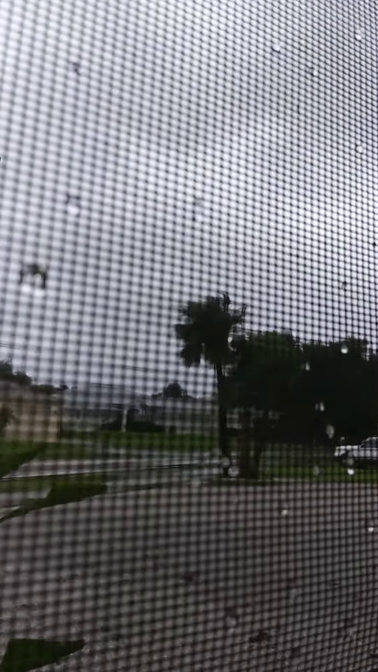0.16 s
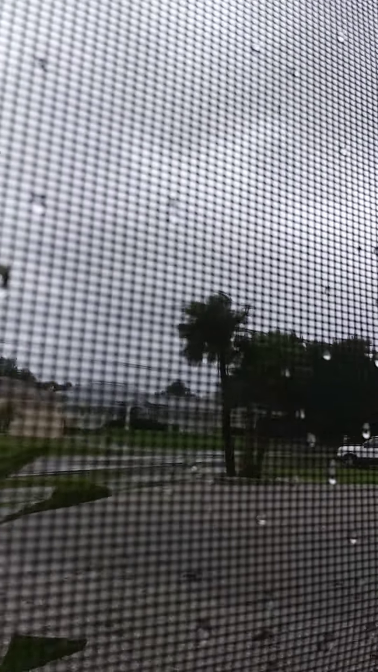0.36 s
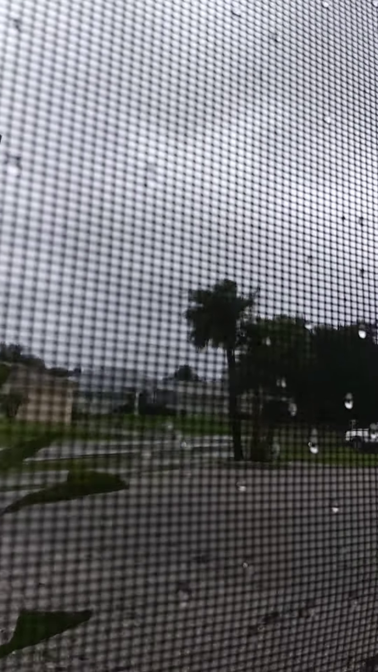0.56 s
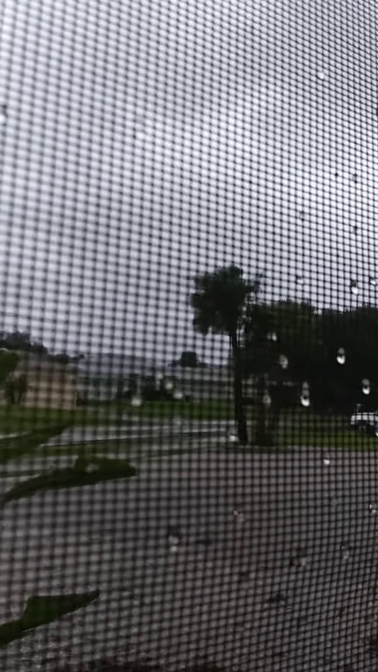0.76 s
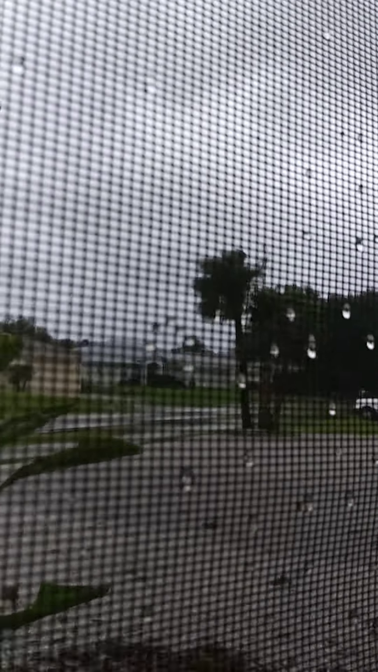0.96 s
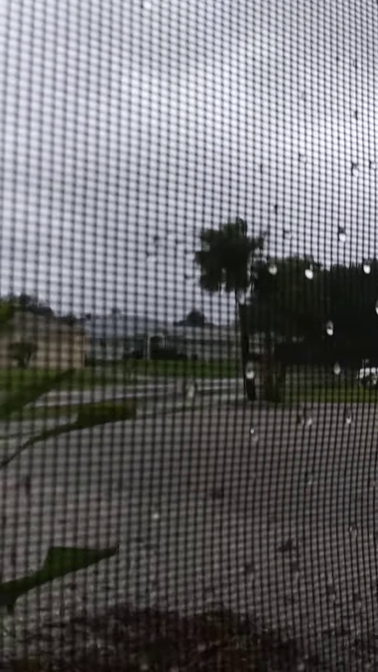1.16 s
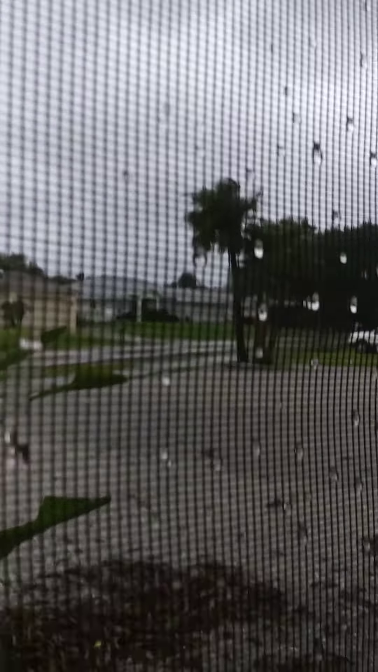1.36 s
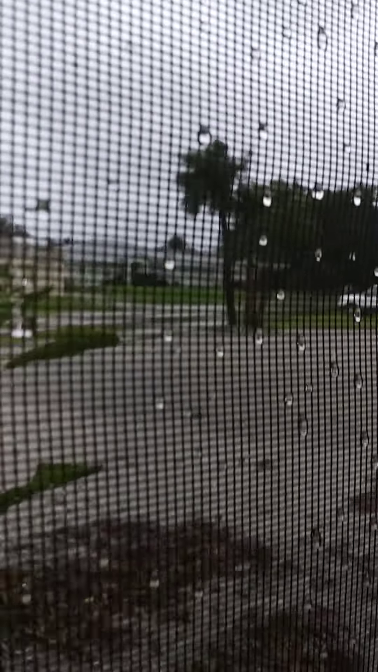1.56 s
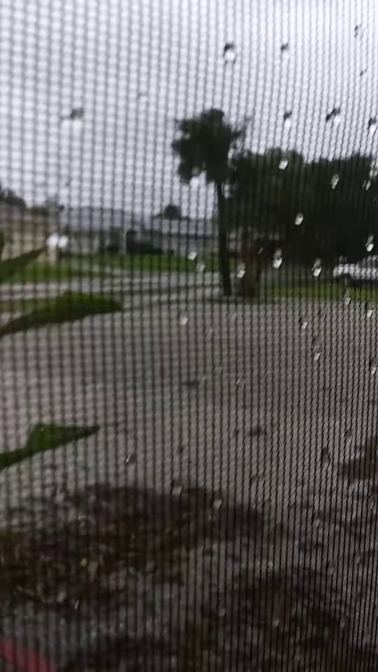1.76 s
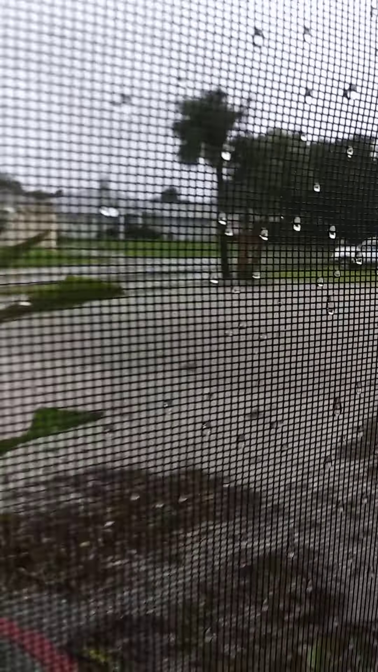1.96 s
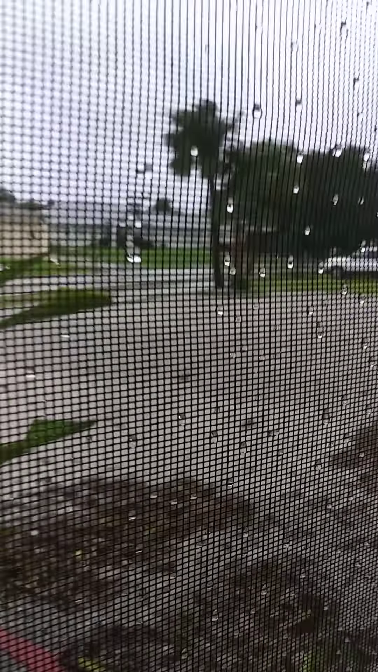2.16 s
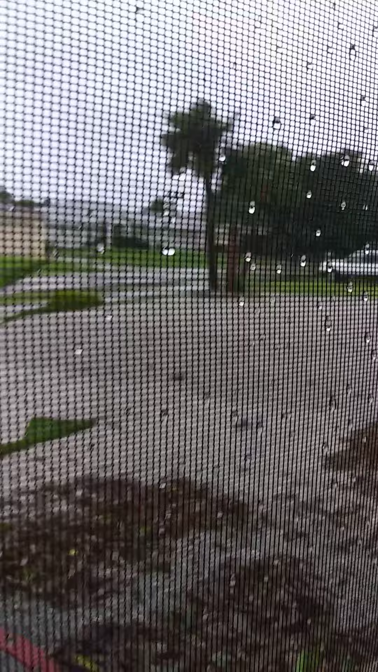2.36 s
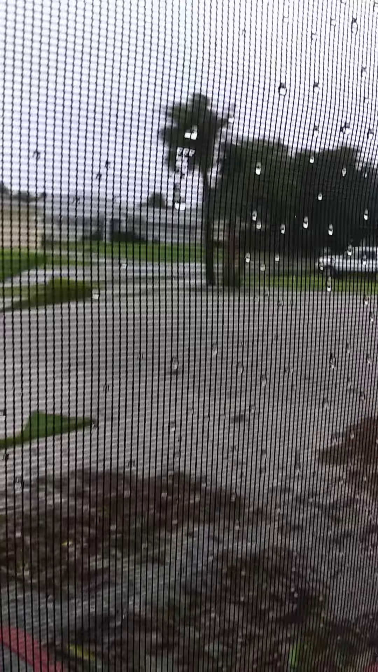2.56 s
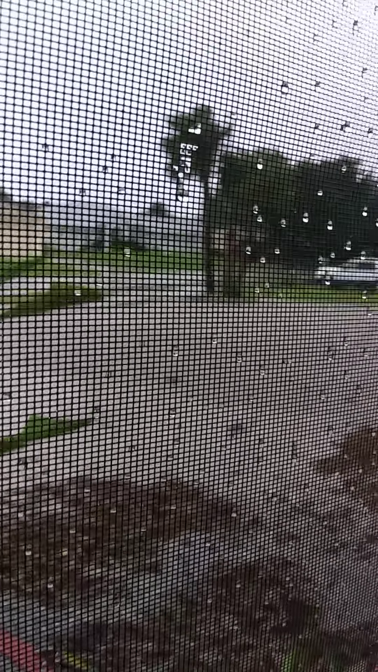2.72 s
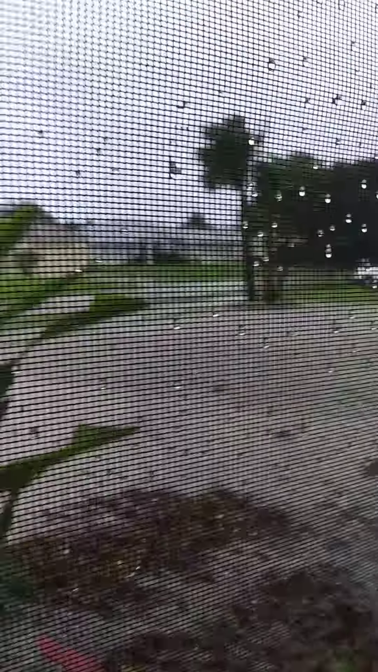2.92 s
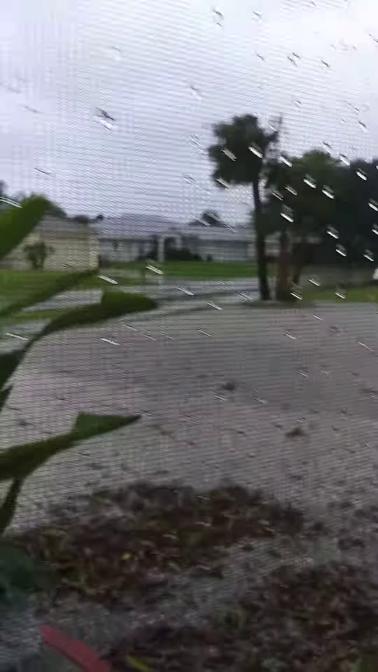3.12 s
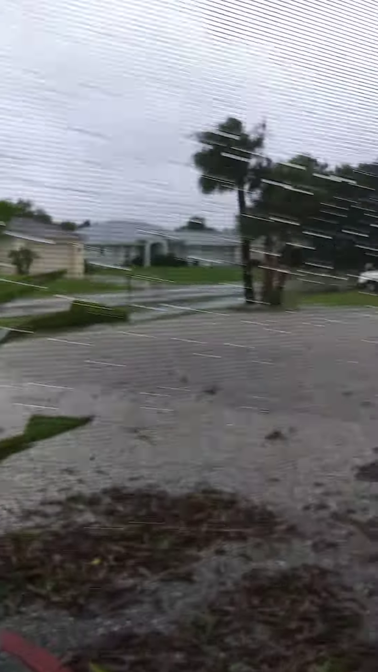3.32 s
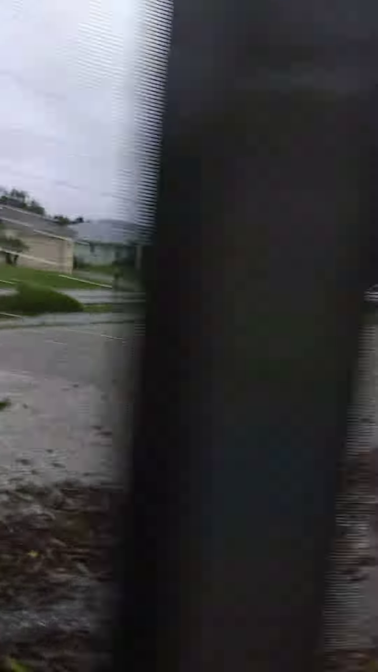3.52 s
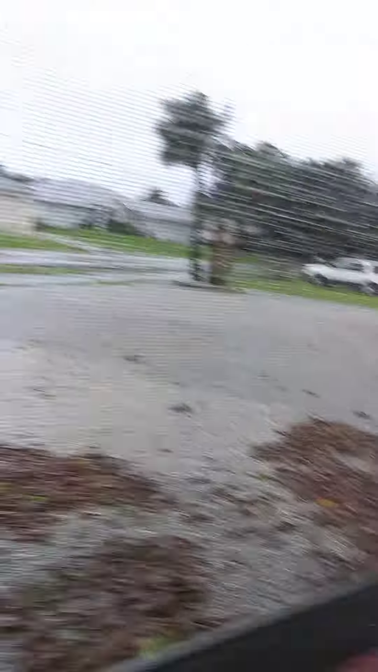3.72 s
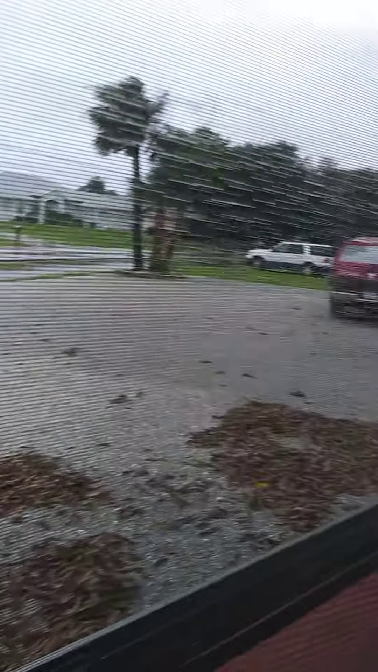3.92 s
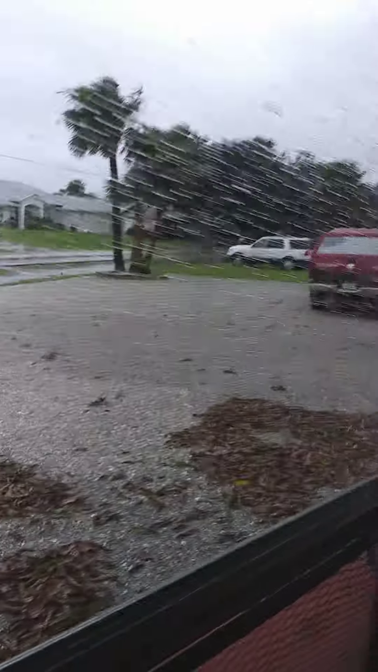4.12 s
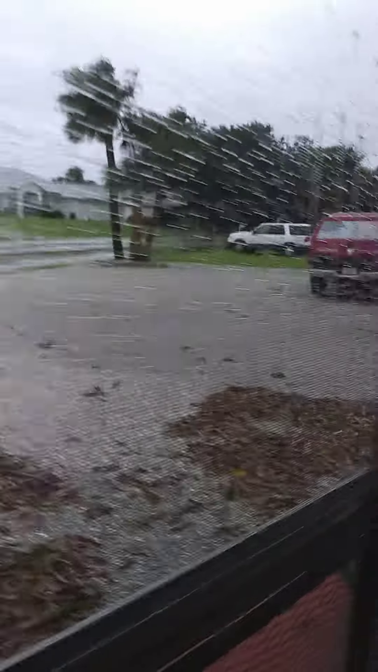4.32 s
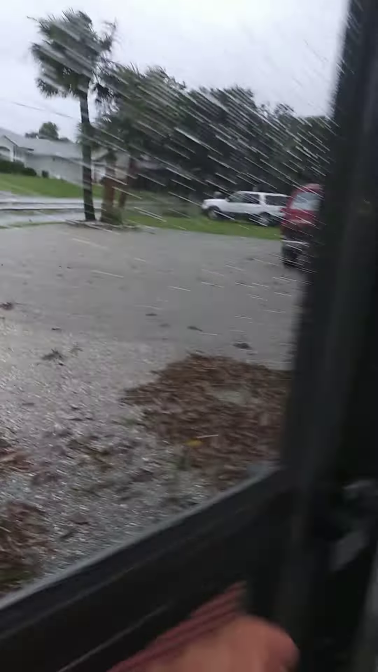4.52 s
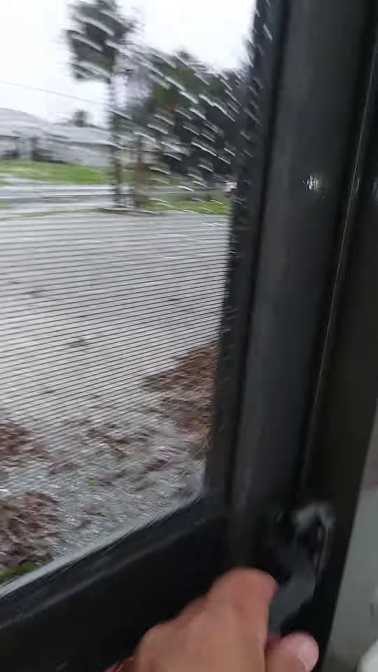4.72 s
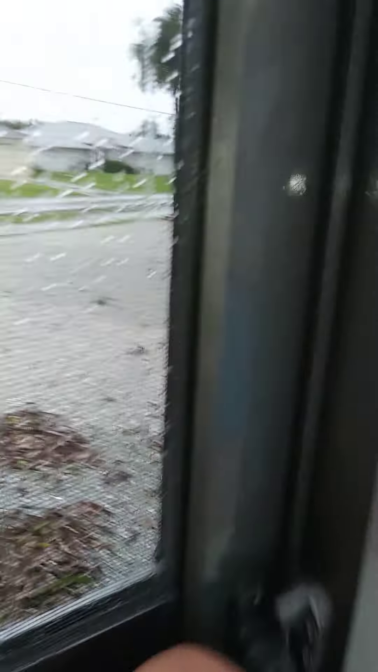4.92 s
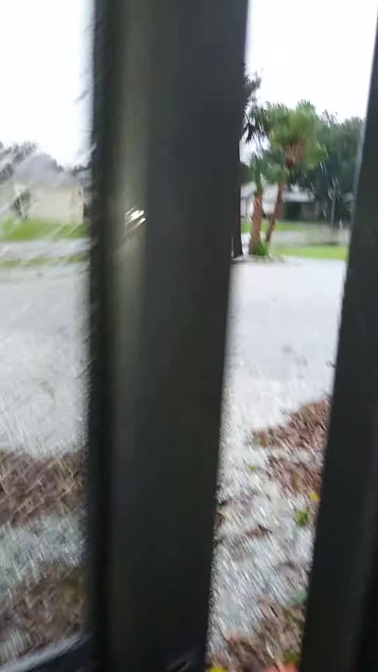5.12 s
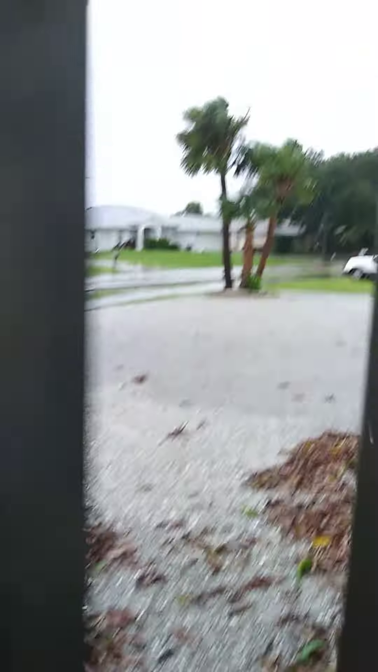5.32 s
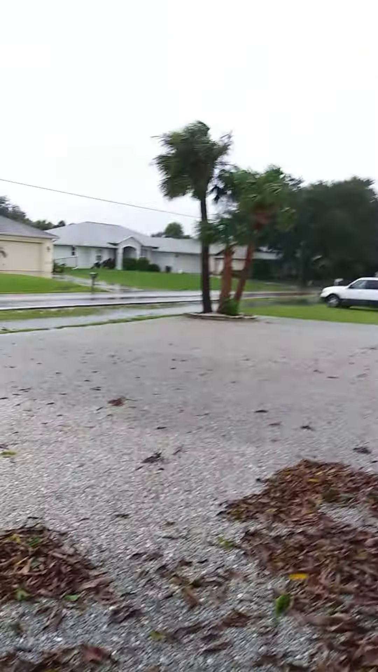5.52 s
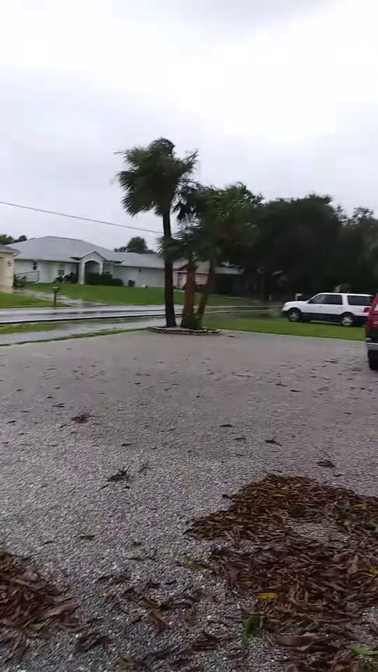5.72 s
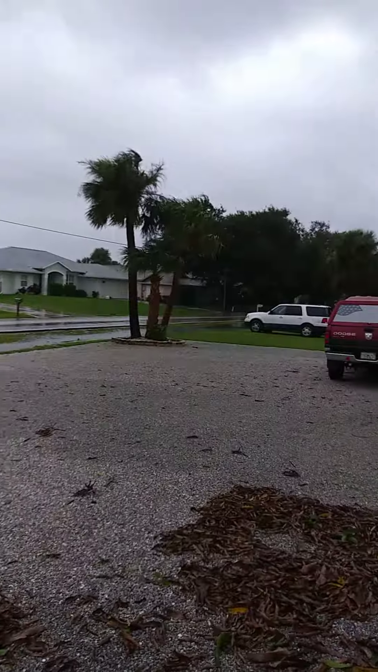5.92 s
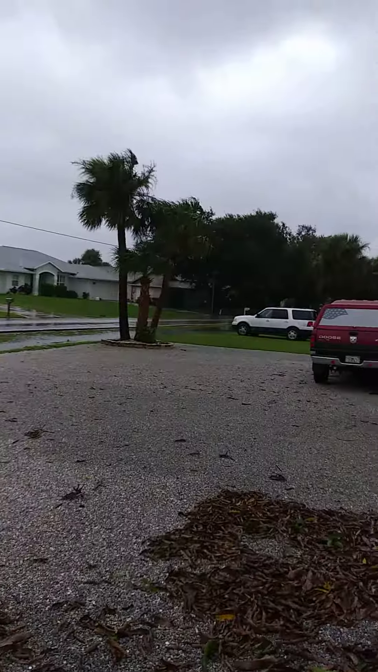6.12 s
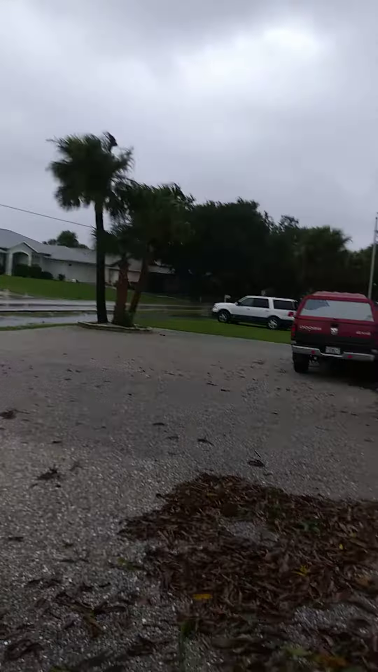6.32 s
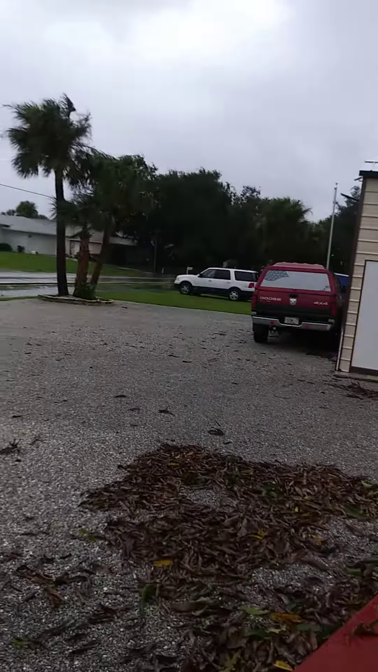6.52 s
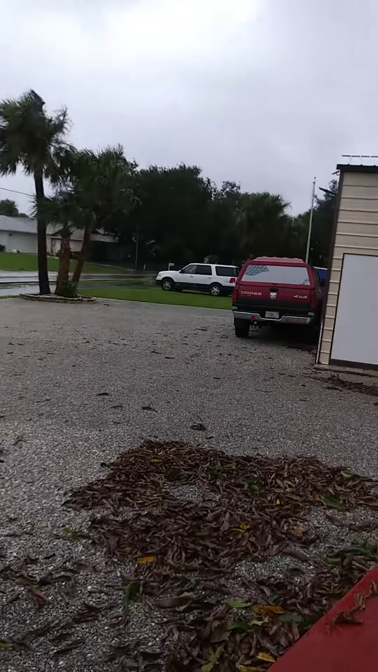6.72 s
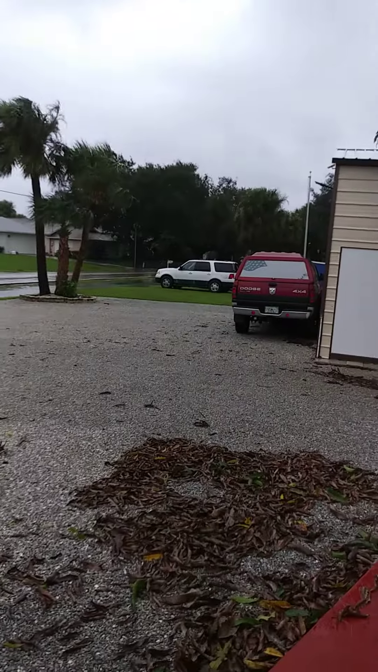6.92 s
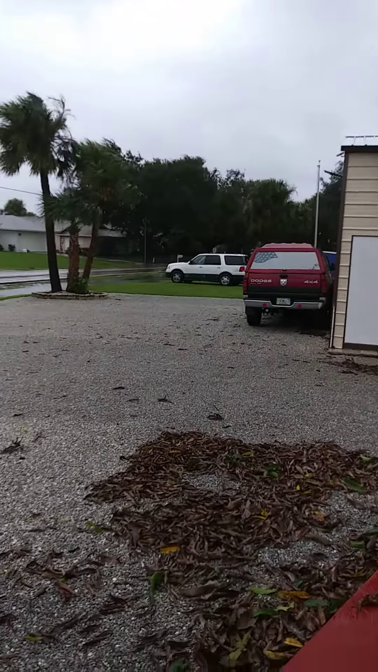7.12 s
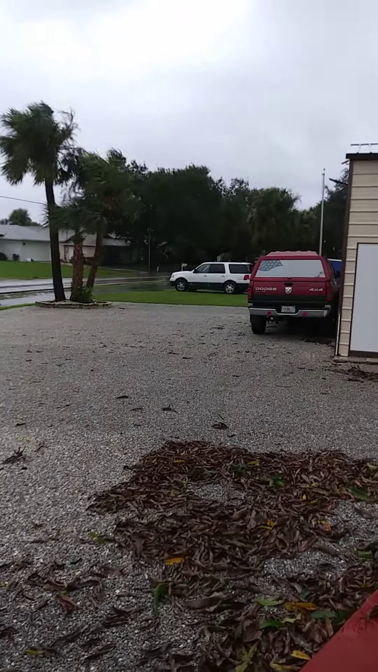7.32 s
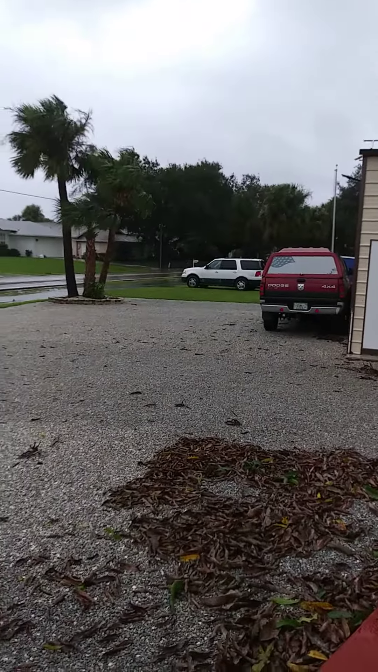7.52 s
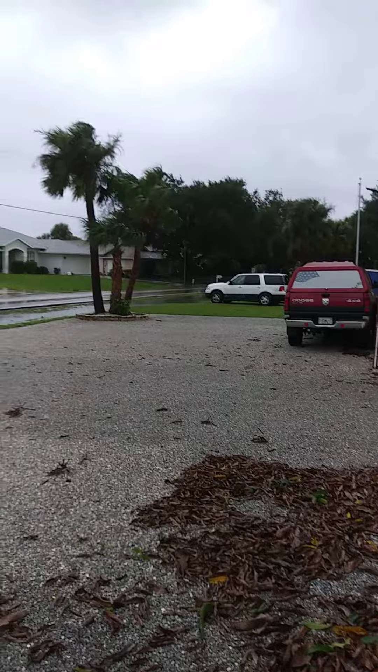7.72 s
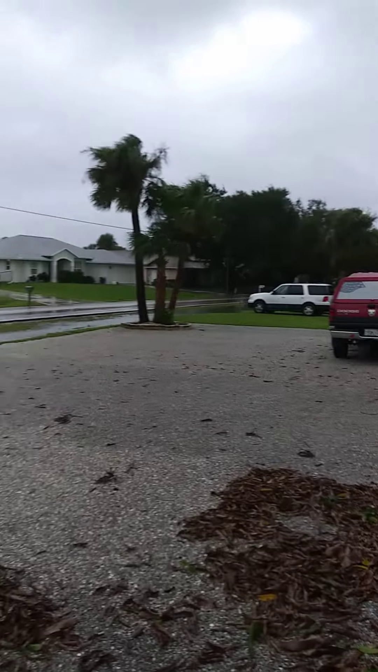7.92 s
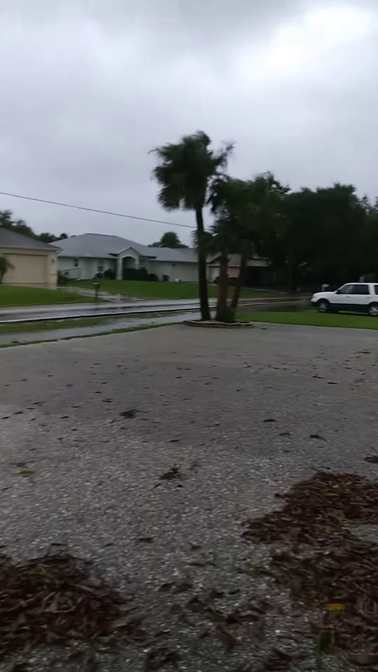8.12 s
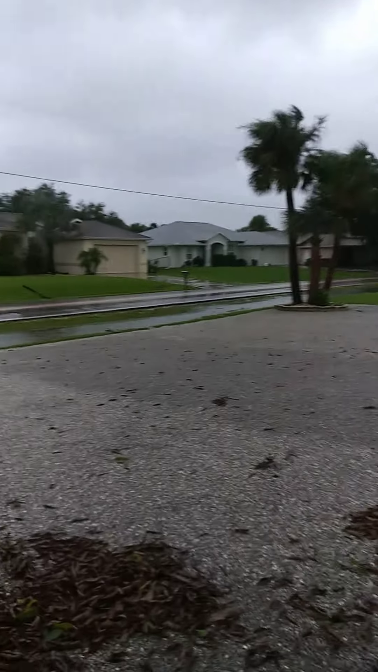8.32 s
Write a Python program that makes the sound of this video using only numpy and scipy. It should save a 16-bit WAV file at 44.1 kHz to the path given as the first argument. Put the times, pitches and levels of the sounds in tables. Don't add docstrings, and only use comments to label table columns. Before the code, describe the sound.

Broad stormy wind and rain throughout; finger taps midway, a loud metal latch and jerky door scrape, finally one rattling knock on the frame.

```python
import sys
import numpy as np
from scipy import signal
from scipy.fft import rfft, irfft
from scipy.io import wavfile
from scipy.ndimage import uniform_filter1d

SR = 44100
rng = np.random.default_rng(int(sys.argv[2]) if len(sys.argv) > 2 else 0)


def waveform_to_disk(signal):
    frames = np.transpose(np.atleast_2d(signal))
    scaled = np.clip(frames, -1, 1) * 32767
    samples = np.round(scaled).astype(np.int16)
    wavfile.write(sys.argv[1], SR, samples)


def amplitude_ratio(level_db):
    exponent = np.asarray(level_db, float) / 20
    return 10 ** exponent


N = 369116
TIME = np.arange(N) / SR

# (frequency [Hz], level [dB], t60 [s])
DOOR_MODES = [(636, -6, 0.016), (1080, -9, 0.014), (1290, -1.5, 0.019), (1615, 3.5, 0.015),
              (2020, 1.5, .016), (2402, -2, 0.008)]
# (frequency [Hz], level [dB], t60 [s])
BODY_MODES = [(231, -0.5, 0.054), (330, -3.5, 0.047), (459, -3, 0.033), (600, 0.5, 0.04), (758, 0, 0.032)]
# (start [s], length [s], rubbing level [dB], grit level [dB], grit centre [Hz])
PUSHES = [
    (4.998, .012, -18.5, -56, 4650),
    (5.046, 0.021, -22, -45, 4800),
    (5.1, .11, -29.5, -48, 4580),
    (5.25, .15, -27, -50, 4300),
    (5.545, 0.12, -26.5, -50.5, 4500),
    (5.69, 0.098, -27.5, -54.5, 5140),
    (5.85, .1, -27.5, -53, 5200),
    (5.959, 0.088, -32.5, -52.5, 4700),
    (6.085, 0.14, -52, -55.5, 4090),
]
# (time [s], peak [dB])
KNOCK = [
    (8.1099, -1.5),
    (8.1125, -6),
    (8.1169, -7),
    (8.1227, -12),
    (8.1304, -11),
    (8.138, -20),
    (8.1453, -19),
    (8.152, -22),
    (8.1988, -27),
]


def unit(x):
    return x / np.sqrt(np.mean(x ** 2))


def band(x, hz, width_hz, order=2):
    upper = hz + width_hz / 2
    edges = np.clip([hz ** 2 / upper, upper], 20, SR / 2.2)
    return signal.sosfilt(signal.butter(order, edges, "bandpass", fs=SR, output="sos"), x)


def ring(x, modes):
    out = 0
    for hz, db, t60 in modes:
        pole = np.exp(2j * np.pi * hz / SR - np.log(1000) / (t60 * SR))
        out = out + amplitude_ratio(db) * signal.lfilter([1], [1, -pole], x).imag
    return out


def add(track, s, sound, db):
    i = max(int(s * SR) - np.abs(sound).argmax(), 0)
    n = min(len(sound), N - i)
    track[i:i + n] += amplitude_ratio(db) * sound[:n] / np.abs(sound).max()


def burst(t60, size=8000):
    return rng.standard_normal(size) * amplitude_ratio(-60 * TIME[:size] / t60)


def walk(rate):
    k = int(SR / rate)
    steps = np.repeat(rng.standard_normal(N // k + 1), k)
    return unit(uniform_filter1d(uniform_filter1d(steps, k), k)[:N])


def columns(table):
    s, *rest = np.transpose(table)
    return [np.interp(TIME, s, c) for c in rest]


def grains(rate, spread_db):
    hit, size, sign = rng.random((3, N))
    strength = amplitude_ratio(-spread_db * np.log(size + 0.021))
    return (hit < rate / SR) * strength * np.sign(sign - .5)


def door():
    # (time [s], peak [dB], ring [Hz])
    latch = [(4.9423, -23, 1020), (4.9481, -7.5, 2580), (4.952, -6, 2300), (4.9564, -5, 2020),
             (4.9605, -3, 1014), (4.9676, -7, 1507), (4.9761, -11, 2050), (4.9805, -15, 1520),
             (4.9838, -10, 1200), (4.989, -14, 1340), (5.0028, -9, 1190), (5.009, -6.5, 1950),
             (5.0179, -18, 1770), (5.0256, -19, 1590), (5.0413, -16, 710), (5.0525, -19, 1830),
             (5.0598, -9.2, 1924)]
    # (time [s], peak [dB], ring [Hz])
    slips = [(5.144, -16.5, 1870), (5.1702, -14.5, 1700), (5.2218, -18.5, 1340), (5.267, -15, 1590),
             (5.2829, -13.5, 1500), (5.3009, -18, 1510), (5.3677, -18, 1640), (5.3849, -16.5, 1570),
             (5.5502, -18, 2150), (5.5582, -15, 2150), (5.5806, -14.5, 2100), (5.5996, -13, 1260),
             (5.6172, -11, 2020), (5.6285, -13.0, 2020), (5.6482, -11.5, 2020), (5.6614, -12.5, 2030),
             (5.688, -16.5, 1310), (5.718, -13.5, 2284), (5.7233, -18, 1670), (5.7551, -16, 2350),
             (5.7749, -15.5, 1240), (5.7833, -16.5, 1230), (5.8538, -17, 2190), (5.8992, -16, 1290),
             (5.911, -17, 1180), (5.9283, -15, 2150), (5.9605, -18, 2220), (5.9934, -17.0, 2000)]
    # (time [s], peak [dB], ring [Hz])
    handle = [
        (.02, -25.5, 2300),
        (4.046, -22, 1990),
        (4.165, -26, 2120),
        (4.185, -26, 2100),
        (4.205, -25, 2100),
        (4.245, -31, 2120),
        (4.285, -26, 2150),
        (4.562, -26.5, 1580),
        (4.617, -26, 1560),
    ]
    rub, grit, grit_hz = pushes()
    panel = unit(band(ring(grains(1500, spread_db=2.0), DOOR_MODES), 1380, 2280, order=3))
    carrier = np.sin(2 * np.pi * np.cumsum(grit_hz) / SR)
    fine = band(grains(700, spread_db=3.5), 260, 900) * carrier
    broad = band(grains(3000, spread_db=4.0), 4900, 4000)
    out = panel * rub * amplitude_ratio(-3.5) + (unit(fine) + 0.75 * unit(broad)) * grit * amplitude_ratio(-1.5)
    out += jerks(slips + chatter(rub), t60=0.018, push_s=.005, width_hz=2000, body_db=-17.5)
    out += jerks(handle, t60=0.057, push_s=0.0092, width_hz=2200, body_db=-20)
    return out + jerks(latch, t60=0.032, push_s=0.008, width_hz=3100, body_db=-18)


def pushes():
    attack_s, release_s = 0.013, 0.019
    start, length, level_db, grit_db, hz = np.transpose(PUSHES)[:, :, None]
    rise = np.exp(np.clip((TIME - start) / attack_s, -50, 0))
    shape = rise * np.exp(np.clip((start + length - TIME) / release_s, -50, 0))
    rub = (shape * amplitude_ratio(level_db)).max(axis=0)
    grit = (shape * amplitude_ratio(grit_db)).max(axis=0)
    return rub, grit, np.interp(TIME, (start + length / 2)[:, 0], hz[:, 0])


def chatter(rub):
    per_s = 60
    above_rub_db, spread_db = 2.5, 3.0
    s = np.arange(PUSHES[2][0], PUSHES[-1][0], 1 / per_s)
    late, size, mode = rng.random((len(s), 3)).T
    s = s + late / per_s
    rub_db = 20 * np.log10(rub[(s * SR).astype(int)])
    db = rub_db + above_rub_db - spread_db * np.log(size + .1)
    hz = np.array(DOOR_MODES)[(mode * len(DOOR_MODES)).astype(int), 0]
    return list(zip(s, db, hz))


def jerks(events, t60, push_s, width_hz, body_db):
    out = np.zeros(N)
    for s, db, hz in events:
        push = burst(push_s, size=2000)
        bend = 1 + 0.072 * rng.standard_normal()
        panel = [(bend * f, level, decay) for f, level, decay in DOOR_MODES]
        add(out, s, band(ring(push, [(hz, 8.0, t60)] + panel), 1500, width_hz, order=4), db)
        add(out, s + 0.00295, band(ring(push, BODY_MODES), 520, 600, order=4), db + body_db)
    return out


def frame():
    # (frequency [Hz], level [dB], t60 [s])
    knock_modes = [(1082, -4, .06), (1238, -1, 0.057), (1360, -3, 0.059), (1443, 2.5, .07),
                   (1580, -2, .045), (1701, -6, .045), (1930, 1.5, .06), (2051, -3, 0.044),
                   (2143, -6, 0.032), (2627, -12, .015), (3100, -22, .01)]
    # (time [s], peak [dB], centre [Hz], t60 [s])
    jingle = [(4.945, -20, 7400, .03), (4.947, -12, 8000, 0.043), (4.9665, -15, 6200, 0.083),
              (4.975, -22, 3700, 0.1), (4.998, -25.5, 6800, .07), (3, -40, 7300, 0.023),
              (8.1103, -31, 7000, 0.027), (8.114, -28.5, 4600, 0.043), (8.114, -32, 13400, 0.027),
              (8.1096, -36, 10000, 0.011), (4.946, -14, 2900, 0.14)]
    out = np.zeros(N)
    for s, db in KNOCK:
        push = burst(0.0025, size=4000)
        add(out, s, band(ring(push, knock_modes), 1650, 2000, order=3), db)
        add(out, s + 0.0021, band(ring(push, BODY_MODES), 580, 600), db - 24.5)
    for s, db, hz, t60 in jingle:
        onset = np.minimum(TIME[:8000] / 0.0028, 1)
        hiss = band(burst(t60) * onset, hz, min(0.54 * hz, 28e6 / hz))
        add(out, s + np.abs(hiss).argmax() / SR, hiss, db - 1.0)
    return out


def thud():
    out = np.zeros(N)
    jolt = ring(np.eye(1, 3000)[0], [(90, 0, .015)])
    add(out, KNOCK[0][0] + .002, jolt, -48)
    return out


def hand():
    # (time [s], peak [dB], thump [Hz], crack relative level [dB])
    taps = [
        (2.9144, -28, 1500, -6),
        (2.9182, -9, 1150, -7.5),
        (2.951, -34, 1500, 5),
        (2.9547, -11.5, 600, 0.5),
        (3.0033, -6.5, 1120, -7),
        (4.022, -23, 450, -25),
        (4.136, -23, 416, -25),
        (8.368, -34, 120, -20),
    ]
    # (time [s], level [dB], centre [Hz], length [ms])
    brushes = [(.315, -46, 5500, 30), (1.862, -48, 8000, 25), (2.445, -44, 4300, 35),
               (3.006, -31, 5500, 14), (3.0065, -24, 1300, 10), (3.145, -29, 2400, 15),
               (4.06, -45, 7000, 20), (4.19, -37, 7000, 22), (4.236, -41, 6000, 22), (4.312, -43, 6500, 25),
               (4.606, -36, 6000, 12), (5.12, -47, 8000, 40), (5.555, -47, 8000, 30),
               (5.715, -47, 8000, 15), (5.985, -45, 8000, 15), (6.66, -40, 6000, 12)]
    # (frequency [Hz], level [dB], t60 [s])
    crack_modes = [(2000, 1, 0.0034), (2900, 0, 0.0034), (4300, -11, .0015), (6340, -9, .002),
                   (9000, -13, .0012)]
    out = np.zeros(N)
    click = np.eye(1, 1500)[0]
    for s, db, hz, crack_db in taps:
        case = [(hz, 0, .0065), (0.4 * hz, -14, .012), (1.65 * hz, -5, .003), (2.3 * hz, -6, .002)]
        add(out, s, band(ring(click, case), 1260, 3550), db)
        crack = band(ring(burst(0.00063, size=1500), crack_modes), 3100, 12000)
        add(out, s - .0003, crack, db + crack_db)
    for s, db, hz, length_ms in brushes:
        t = TIME[:4000]
        shape = np.exp(-(t * 1e3 / length_ms) ** 2) * np.minimum(t / 0.0062, 1)
        hiss = band(shape * rng.standard_normal(4000), hz, .7 * hz, order=3)
        add(out, s + np.abs(hiss).argmax() / SR, hiss, db)
    return out


def drips():
    # (time [s], peak [dB], ring [Hz])
    clear = [(0.3784, -35.5, 4440), (0.6075, -38, 5230), (1.2556, -34.5, 4240), (1.4669, -38, 4500),
             (1.6349, -35, 4480), (1.6595, -41, 4570), (1.817, -35.0, 4200), (1.8817, -37, 4720),
             (1.9379, -34, 4500), (2.2065, -42, 3730), (2.4636, -36, 3980), (3.1726, -36, 4970),
             (3.8704, -40, 4840), (6.6678, -34, 4740), (8.0524, -36, 4270), (8.3002, -43, 3730)]
    # (time [s], peak [dB], ring [Hz])
    door_ticks = [(5.0546, -36, 5170), (5.1033, -37, 4600), (5.6284, -30.5, 4700), (5.6622, -36, 4070),
                  (5.6919, -35, 4460), (5.7834, -37, 4800), (6.0349, -38, 5216), (5.724, -28.5, 5250),
                  (5.8533, -37, 5910), (5.9287, -33.0, 5700), (5.9938, -35, 4780), (6.116, -33, 3900),
                  (6.1453, -34, 3880), (6.1988, -43, 4430), (6.2637, -41.0, 4090)]
    stray_count, stray_db, stray_spread_db, stray_hz = 24, -45.5, 2.5, 4700
    out = np.zeros(N)
    when, size, pitch = rng.random((stray_count, 3)).T
    level_db = stray_db + stray_spread_db * (2 * size - 1)
    stray = zip(when * N / SR, level_db, stray_hz * (.8 + .4 * pitch))
    for s, db, hz in clear + door_ticks + list(stray):
        spot = ring(burst(.02, size=2000), [(hz, 0, .008), (1.12 * hz, -6, .006)])
        add(out, s, band(spot, hz, 2200), db - .6)
        splash = band(burst(0.0072, size=2000), 5500, 5000)
        add(out, s, splash, db - 10)
    modes = [(4500, -2, 0.0043), (5400, 0, 0.0043), (8000, -2, 0.0033)]
    faint = band(ring(grains(60, spread_db=2.5), modes), 5900, 6000)
    return out + unit(faint) * amplitude_ratio(np.where(TIME < 3.9, -63.5, -68))


def storm():
    # (time [s], level [dB])
    strength = [
        (0.0, -37),
        (1.2, -37),
        (1.8, -36),
        (2.6, -36.5),
        (3.12, -35.5),
        (3.9, -37),
        (4.9, -36.5),
        (6.2, -38),
        (7.2, -37.5),
        (8.37, -36.8),
    ]
    # (frequency [Hz], density [dB per Hz])
    rush = [(53, -63), (90, -38.5), (141, -22), (261, -8), (463, -5), (545, -5), (642, -1.5), (1030, -1),
            (2150, -3), (2750, -9), (3440, -20.5), (4680, -17.5), (6630, -24), (9010, -26.5),
            (12000, -44.5), (15600, -68), (22000, -120)]
    calm_db = -37
    gust_db, gust_slope, hiss_db, hiss_slope = -1.5, 1.6, -3, -.3
    outside_db = -0.7
    level_db, = columns(strength)
    rise_db = level_db - calm_db
    bass_db = gust_db + gust_slope * rise_db
    treble_db = hiss_db + hiss_slope * rise_db + outside_db * (TIME > 4.4)
    hz = np.fft.rfftfreq(N, 1 / SR) + 1
    rush_hz, rush_db = np.transpose(rush)
    colour = amplitude_ratio(np.interp(np.log(hz), np.log(rush_hz), rush_db))
    patter = unit(grains(900, spread_db=3.0))
    spectrum = rfft(rng.standard_normal(N) + 0.39 * patter) * colour
    spectrum = spectrum / np.sqrt(np.mean(irfft(spectrum, N) ** 2))
    out, swell, near = 0, walk(7), walk(14)
    for centre in 2 ** np.arange(5.5, 14.5, .5):
        share = np.cos(np.pi * np.clip(np.log2(hz / centre), -.5, .5)) ** 2
        near = .7 * near + .7 * walk(14)
        tilt_db = treble_db * (centre > 3200) + bass_db * (centre < 300)
        out = out + irfft(spectrum * share, N) * amplitude_ratio(0.13 * swell + 0.66 * near + tilt_db)
    return out * amplitude_ratio(level_db + 0.16)


def scene():
    near = band(hand() + door() + drips() + frame(), 1700, 30000, order=3)
    porch = amplitude_ratio(-39) * band(burst(.18, size=9000), 1500, 3000)
    tail = signal.oaconvolve(near, porch)[:N]
    return (storm() + thud() + near + tail)[None, :]


def low_pass(x):
    return signal.sosfilt(signal.butter(12, 16810, fs=SR, output="sos"), x)


def record(dry):
    bent = np.tanh(.8 * dry) / .8 + .012 * uniform_filter1d(dry ** 4, size=60)
    hiss, floor = rng.standard_normal((2, N))
    x = bent + amplitude_ratio(-67) * band(hiss, 5000, 40000, order=1) + amplitude_ratio(-80) * floor
    x = signal.sosfilt(signal.ellip(8, .3, 26, 15750, fs=SR, output="sos"), x)
    return low_pass(x)


dry = scene()
out = record(dry)
waveform_to_disk(out)
```